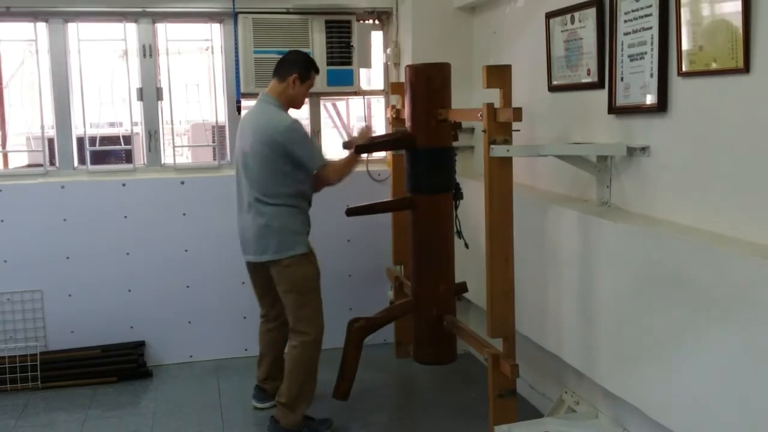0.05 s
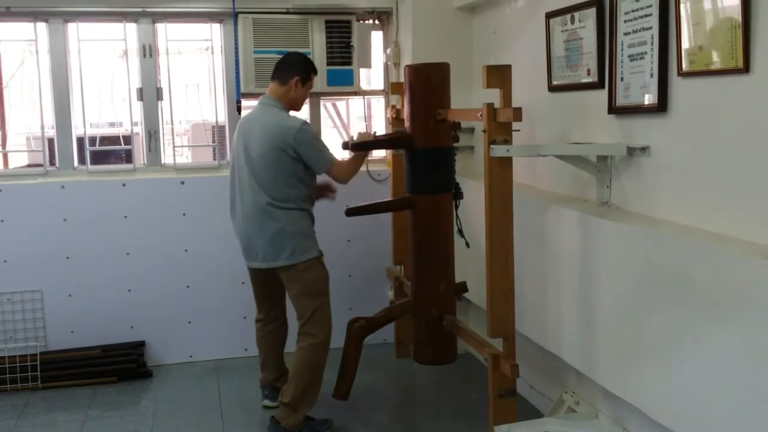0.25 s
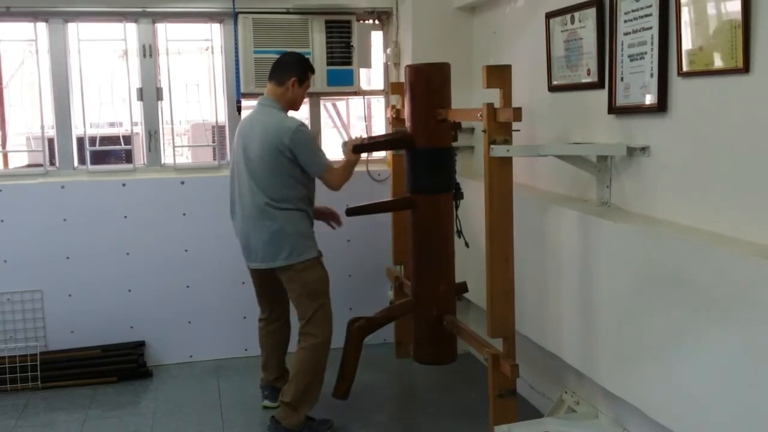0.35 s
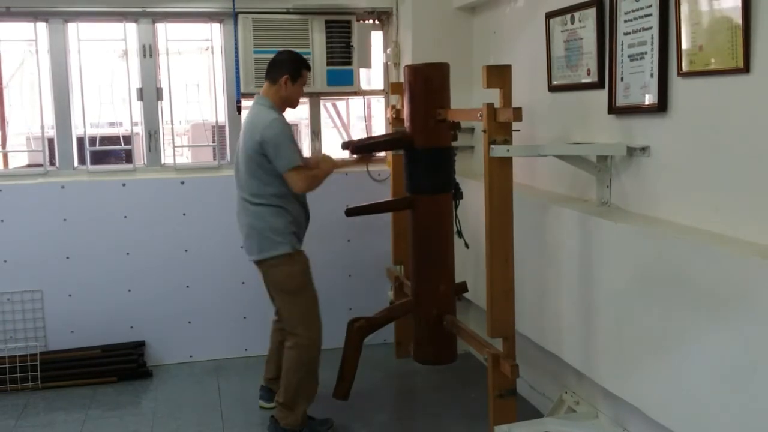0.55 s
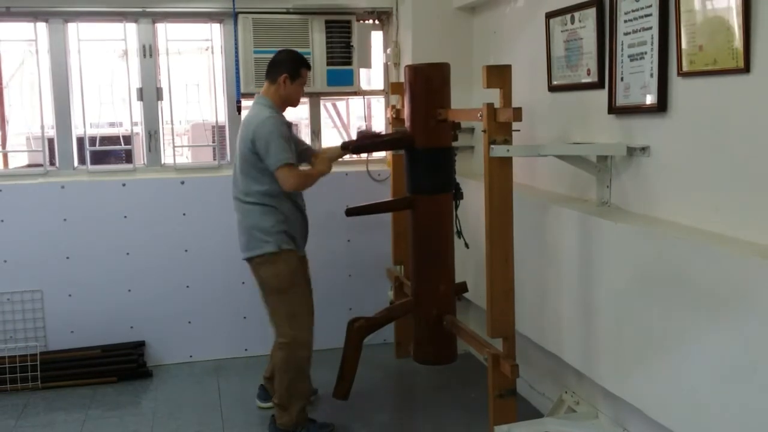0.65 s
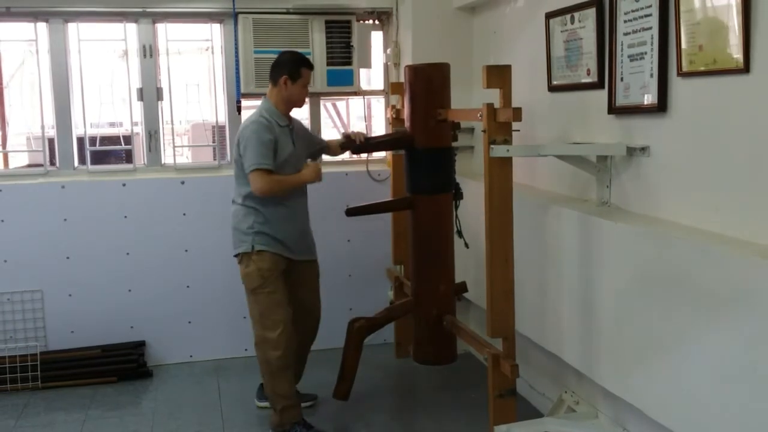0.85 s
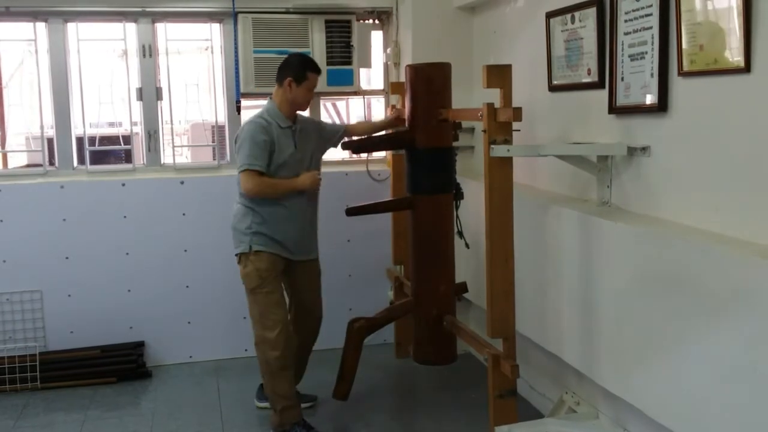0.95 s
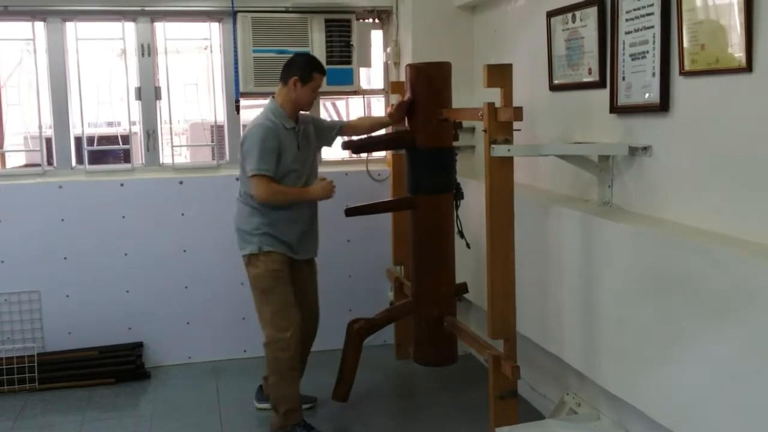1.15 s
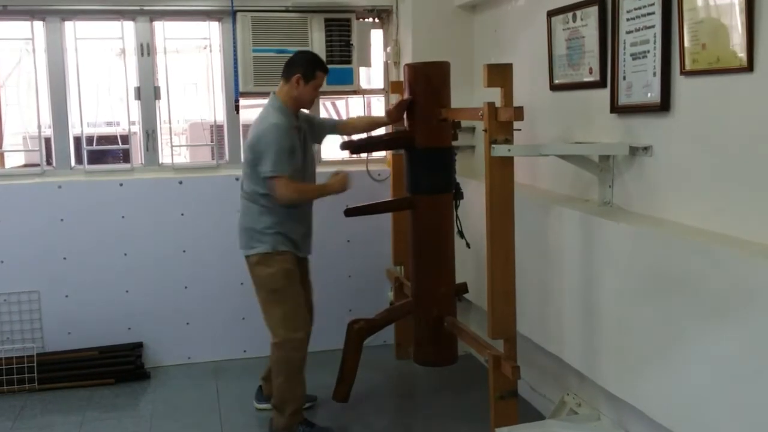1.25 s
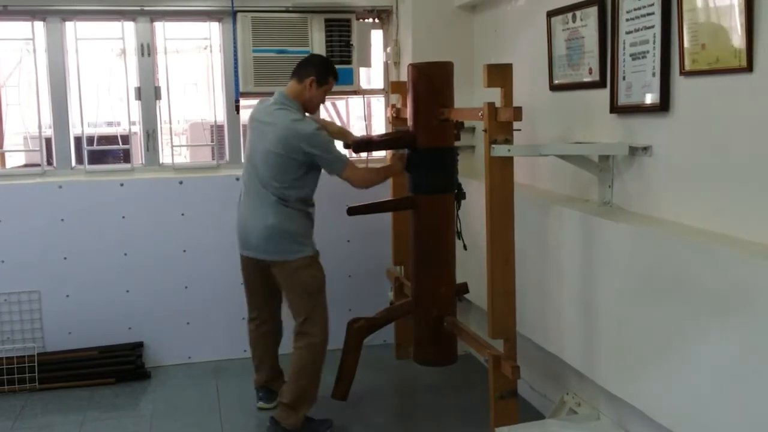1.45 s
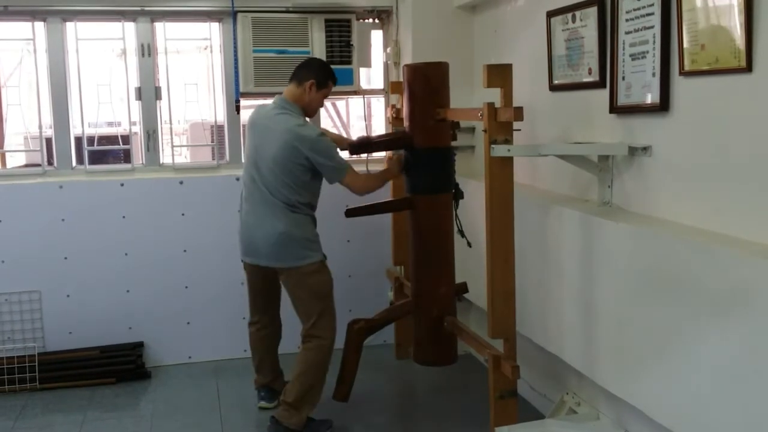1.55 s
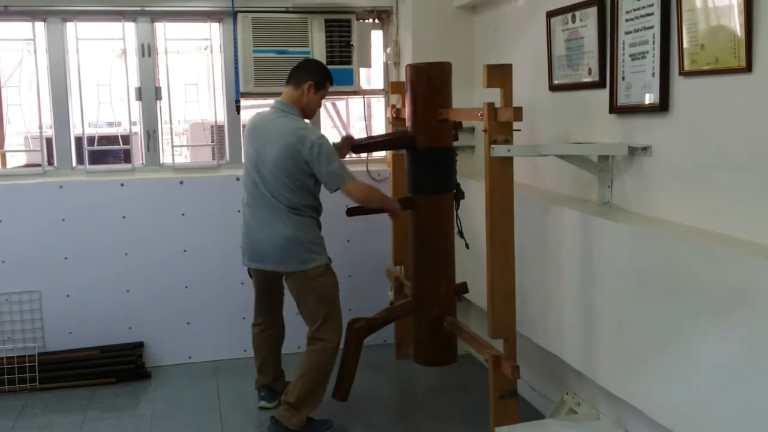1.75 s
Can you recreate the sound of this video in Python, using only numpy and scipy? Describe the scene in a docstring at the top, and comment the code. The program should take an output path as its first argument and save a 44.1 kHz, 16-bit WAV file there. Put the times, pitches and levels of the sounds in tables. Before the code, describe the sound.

Hard wooden knocks from forearms hitting a training dummy, then a padded slap, in an echoing room

```python
"""A small, hard-walled room: forearms strike a wooden training dummy, then a palm slaps its padded trunk. Twice
a loose wooden arm knocks in its socket: noise cracks over ringing sine waves that die away. Sleeves swish and
the frame rumbles (noise that swells and falls); the slap is a short burst of noise. Echoes are fading noise,
the background hum is noise that dips after the knocks, and a gain control ducks loud moments."""
import sys
import numpy as np
from scipy import signal
from scipy.fft import rfft, irfft, next_fast_len
from scipy.io import wavfile
from scipy.ndimage import uniform_filter1d

SR = 44100
rng = np.random.default_rng(int(sys.argv[2]) if len(sys.argv) > 2 else 0)


def dump_mix(stems):
    """Bounce the given channels to the path in sys.argv[1] as a 16-bit WAV at rate SR."""
    frames = np.atleast_2d(stems).T  # one column per channel
    limited = np.clip(frames, -1, 1)  # hard clip at full scale
    pcm = np.round(limited * 32767).astype(np.int16)
    wavfile.write(sys.argv[1], SR, pcm)


N = 79380  # samples: 1.8 seconds

# Levels in the tables are relative. A t60 is the time to fade by 60 dB.
# Background hum, tone colour: pitch_hz, level_db
HUM_COLOUR = [(20, -21), (40, -6), (80, 1), (140, -0.5), (290, -2.5), (500, -6.5), (700, -11),
              (1600, -16.5), (3500, -25.5), (8000, -31), (11000, -40.5), (15000, -54)]
# Level of the hum over time, held down after the knocks: time_s, level_db
HUM_LEVEL = [(0, -38), (.2, -41.5), (.68, -45.5), (1.1, -38.5), (1.45, -41)]
# Ringing modes of the wooden arms: pitch_hz, t60_s, first_place_level_db, second_place_level_db
WOOD_MODES = [(213.6, 0.25, -15, -27), (386.4, 0.071, -18, -5.5), (622.3, 0.08, -12.5, -4.5),
              (730.5, 0.043, -3, -4.5), (821.5, 0.097, -4, -3), (989, 0.025, -26.5, -11),
              (1317.5, 0.11, -6, 2.5), (1469.4, 0.072, -8.5, 4), (1588, 0.053, -19, 3),
              (1657, 0.041, -0.5, -3), (1882, 0.041, -4.5, -6.5), (1946, 0.18, -7, -10.5),
              (2090, 0.025, -7, -17), (2345, 0.048, -7, -6.5), (3397, 0.023, -10, -19),
              (3472, 0.044, -10, -19)]
# Contacts of an arm with its socket: start_s, level_db, striking_place (0 = first, 1 = second)
KNOCKS = [(.2030, 15.5, 0.26), (0.2097, 14.5, 0.14), (0.2234, 7.5, 0), (0.7933, 5, 0.94), (.8000, 8, 1),
          (.8040, 14.5, 0.87), (.8118, 10, 1), (.8270, 7, 0.57)]
# Contact noise of the knocks, tone colour: pitch_hz, level_db
CRACK_COLOUR = [(70, -59), (140, -35), (260, -12), (550, -4), (1050, 0), (1900, 4), (2600, -2.5),
                (4200, -11), (6000, -18), (8500, -19.5), (11000, -40), (15000, -63)]
# Swishes of the sleeves: peak_s, level_db, rise_s, fall_s
SWISHES = [(.203, -43, 0.014, 0.019), (0.507, -52, 0.0068, 0.016), (.765, -57.5, 0.044, 0.024),
           (.81, -42, .008, 0.0047), (1.415, -50.5, 0.016, 0.051), (1.455, -54, 0.013, 0.022),
           (1.514, -41, 0.015, 0.07), (1.685, -38, .025, 0.038), (1.779, -43, 0.023, 0.035)]
# Cloth hiss, tone colour: pitch_hz, level_db
CLOTH_COLOUR = [(120, -27), (400, -8), (1200, 2.5), (2500, -0.5), (6000, 0), (10000, -2.5), (13500, -5),
                (15000, -11)]
# The trunk shifting on its frame: peak_s, level_db, rise_s, fall_s
THUDS = [(.34, 4, 0.0081, 0.033), (1.15, -12.5, .08, 0.23), (1.505, 10, 0.0114, 0.071),
         (1.61, -0.5, 0.016, 0.11), (1.725, 3, 0.034, 0.073), (1.792, -1, .01, .05)]
# Rumble of the trunk, tone colour: pitch_hz, level_db
THUD_COLOUR = [(25, -10), (60, -11), (130, 0.5), (250, -7.5), (420, -7), (600, -16.5), (1200, -17),
               (3000, -83)]
# Palm on the padding: start_s, level_db
SLAPS = [(1.4874, -0.5), (1.4900, 5.5)]
# Slap noise, tone colour: pitch_hz, level_db
SLAP_COLOUR = [(100, -1), (450, 11), (750, -1), (1200, 5.5), (1700, 1), (4000, -2), (7000, -1),
               (10000, -12.5), (14500, -19)]
# How long the room echoes: pitch_hz, t60_s
ROOM_FADE = [(100, 1.14), (380, 1.1), (800, 0.76), (1400, 0.75), (2200, 0.86), (4000, 0.77), (8000, 0.83),
             (14000, 0.13)]
# How alike left and right are in noise from all around: pitch_hz, likeness (0-1)
ALIKE = [(60, 0.9), (280, 0.99), (600, 0.34), (1300, 0), (8000, 0)]
# Balance of the two sides: pitch_hz, left_minus_right_db
BALANCE = [(60, -1.5), (300, -4), (700, -2.7), (2000, -1.5), (4000, -0.6), (8000, -2), (14000, -5)]

# Knocks: overall level, and the pitch below which the slim arms radiate little
KNOCK_DB, WOOD_LOW_HZ = 6, 240
# Crack: level at the first place for a full blow, added level at the second place, fading time
CRACK_DB, CRACK_SECOND_PLACE_DB, CRACK_T60_S = 4.5, -6.5, 0.012
# Table level of a full blow, and dB of extra crack per dB of blow
FULL_BLOW_DB, CRACK_DB_PER_DB = 13.5, 0.31
THUD_DB, SLAP_T60_S = -40, 0.012
# Sound that arrives straight from the source, beside the echoes
KNOCK_DIRECT_DB, SLAP_DIRECT_DB, SOFT_DIRECT_DB = -11.5, -8.5, -2.5
# Echoes of the near walls: level against the long tail, and fading time
EARLY_DB, EARLY_T60_S = -9.5, 0.12
EVEN_HZ = 70  # width over which noise bursts are levelled out
# Gain control: threshold, dB of ducking per dB above it, and time constants
LIMIT_DB, SQUEEZE, GAIN_ATTACK_S, RECOVER_S = -14, 0.34, 0.0079, 0.29
TOP_HZ = 15100  # nothing is kept from here up


def amp(db):
    """Turn decibels into a plain gain."""
    return 10 ** (np.asarray(db) / 20)


def unit(x):
    """Scale to an average strength (rms) of 1."""
    return x / np.sqrt(np.mean(x ** 2) + 1e-20)


def burst(x):
    """Scale so that the energy, averaged over any channels, is 1."""
    return unit(x) / np.sqrt(x.shape[-1])


def along(points, hz):
    """Read a value off (pitch, value) points, spaced by the logarithm of pitch."""
    pitch_hz, value = np.transpose(points)
    return np.interp(np.log(hz + 1), np.log(pitch_hz + 1), value)


def fade(t60_s):
    """Exponential fade that loses 60 dB in t60_s, as long as the whole scene."""
    return np.exp(-np.log(1000) * np.arange(N) / SR / t60_s)


def delayed(x, start_s):
    """Make stereo sound x start later."""
    return np.pad(x, [(0, 0), (round(start_s * SR), 0)])[..., :N]


def filtered(x, response):
    """Multiply the spectrum of x by a gain that depends on pitch."""
    length = next_fast_len(N + SR // 2)
    gain = response(np.fft.rfftfreq(length, 1 / SR))
    return irfft(rfft(x, length) * gain, length)[..., :N]


def coloured(x, points, size=8192):
    """Give x a tone colour with a filter that only acts forward in time."""
    gain = amp(along(points, np.fft.rfftfreq(size, 1 / SR)))
    # Folding the cepstrum puts the filter's energy as early as possible
    cepstrum = irfft(np.log(gain))
    cepstrum[1:size // 2] *= 2
    cepstrum[size // 2 + 1:] = 0
    impulse = irfft(np.exp(rfft(cepstrum)))
    return signal.fftconvolve(x, impulse)[:N]


def evened(x):
    """Level out the broad chance peaks and dips in the spectrum of a short noise decay."""
    spectrum = rfft(x, 2 * N)
    width_bins = int(EVEN_HZ * 2 * N / SR)
    power = np.abs(uniform_filter1d(np.abs(spectrum) ** 2, size=width_bins))
    return burst(irfft(spectrum / np.sqrt(power + 1e-12))[..., :N])


def puff(colour, t60_s):
    """Contact noise: a short, coloured burst that fades at once."""
    noise = rng.standard_normal(N) * fade(t60_s)
    return burst(coloured(evened(noise), colour))


def swells(rows, colour):
    """Coloured noise that rises smoothly to each peak and falls away exponentially."""
    t = np.arange(N) / SR
    level = np.zeros(N)
    for peak_s, level_db, rise_s, fall_s in rows:
        after = t - peak_s
        drop = np.where(after < 0, (after / rise_s) ** 2, after / fall_s)
        level += amp(level_db) * np.exp(-drop)
    return level * unit(coloured(rng.standard_normal(N), colour))


def diffuse():
    """Stereo noise from all around: alike in the bass, unrelated in the treble."""
    def middle_and_side(hz):
        angle = np.arccos(along(ALIKE, hz)) / 2
        return np.array([np.cos(angle), np.sin(angle)])

    middle, side = filtered(rng.standard_normal((2, N)), middle_and_side)
    return np.array([middle + side, middle - side])


def in_room(x, direct_db, size=512):
    """Add near-wall echoes and a long tail whose fading time depends on pitch."""
    hz, t, grains = signal.stft(diffuse(), SR, nperseg=size)
    tail_fade = np.exp(-np.log(1000) * t / along(ROOM_FADE, hz)[:, None])
    tail = signal.istft(grains * tail_fade, SR, nperseg=size)[1][:, :N]
    near_walls = burst(diffuse() * fade(EARLY_T60_S))
    echoes = evened(burst(tail) + amp(EARLY_DB) * near_walls)
    return amp(direct_db) * x + signal.fftconvolve(x[None], echoes, axes=1)[:, :N]


def hum():
    """Background of ventilation and the street, held down after the knocks: coloured noise from all around."""
    level_db = np.interp(np.arange(N) / SR, *np.transpose(HUM_LEVEL))
    noise = filtered(diffuse(), lambda hz: amp(along(HUM_COLOUR, hz)))
    return amp(level_db) * unit(noise)


def wood_ring(place):
    """Fading sine waves; the striking place sets how strongly each mode of the wood rings."""
    t = np.arange(N) / SR
    ring = np.zeros(N)
    for k, (pitch_hz, t60_s, first_db, second_db) in enumerate(WOOD_MODES):
        level_db = first_db + place * (second_db - first_db)
        mode = burst(np.sin(2 * np.pi * pitch_hz * t) * fade(t60_s))
        ring += (-1) ** k * amp(level_db) * mode  # neighbouring modes start in opposite directions
    high_pass = signal.butter(2, WOOD_LOW_HZ, "high", fs=SR, output="sos")
    return signal.sosfilt(high_pass, ring)


def knocks():
    """Each contact cracks and rings the wood; harder blows have more crack."""
    out = np.zeros((2, N))
    for start_s, level_db, place in KNOCKS:
        harder_db = CRACK_DB_PER_DB * (level_db - FULL_BLOW_DB)
        crack_db = CRACK_DB + place * CRACK_SECOND_PLACE_DB + harder_db
        crack = amp(crack_db) * puff(CRACK_COLOUR, CRACK_T60_S)
        knock = in_room(burst(wood_ring(place) + crack), KNOCK_DIRECT_DB)
        out += amp(level_db) * delayed(knock, start_s)
    return amp(KNOCK_DB) * out


def sleeves():
    """Cloth hiss swells and falls with the movement of the arms."""
    return in_room(swells(SWISHES, CLOTH_COLOUR), SOFT_DIRECT_DB)


def thuds():
    """The heavy trunk rumbles dully on its rails as weight shifts against it."""
    return amp(THUD_DB) * in_room(swells(THUDS, THUD_COLOUR), SOFT_DIRECT_DB)


def slap():
    """Palm and fingers land on the padding: short noise bursts with no ringing tones."""
    out = np.zeros((2, N))
    for start_s, level_db in SLAPS:
        contact = in_room(puff(SLAP_COLOUR, SLAP_T60_S), SLAP_DIRECT_DB)
        out += amp(level_db) * delayed(contact, start_s)
    return out


def scene():
    """Add all the sounds, with the right side a little stronger than the left."""
    everything = hum() + knocks() + sleeves() + thuds() + slap()
    # Half of the difference goes to each side
    return filtered(everything, lambda hz: amp(np.outer([0.5, -0.5], along(BALANCE, hz))))


def record(dry):
    """The gain control ducks loud sound quickly and recovers slowly; then the top is cut off."""
    pole = np.exp(-1 / (SR * GAIN_ATTACK_S))
    power = signal.lfilter([1 - pole], [1, -pole], np.mean(dry ** 2, axis=0))
    over_db = np.maximum(10 * np.log10(power + 1e-12) - LIMIT_DB, 0)
    # Hold each peak of the excess and let it fade at the recovery rate
    recovery = np.exp(-np.arange(N) / SR / RECOVER_S)
    held_db = np.maximum.accumulate(over_db / recovery) * recovery
    ducked = dry * amp(-SQUEEZE * held_db)
    return filtered(ducked, lambda hz: hz < TOP_HZ)


dry = scene()
out = record(dry)
dump_mix(out)
```